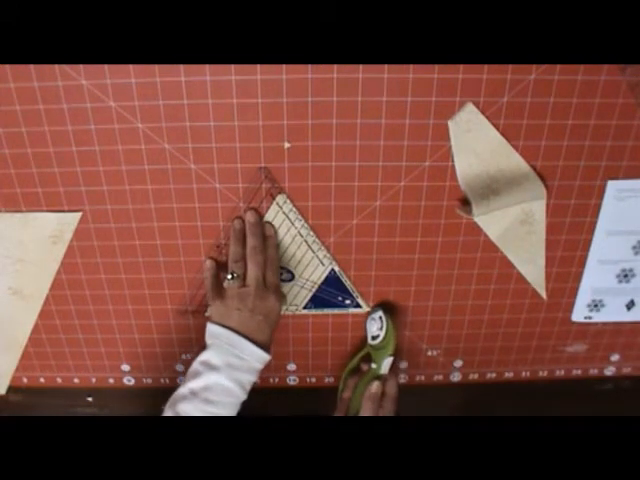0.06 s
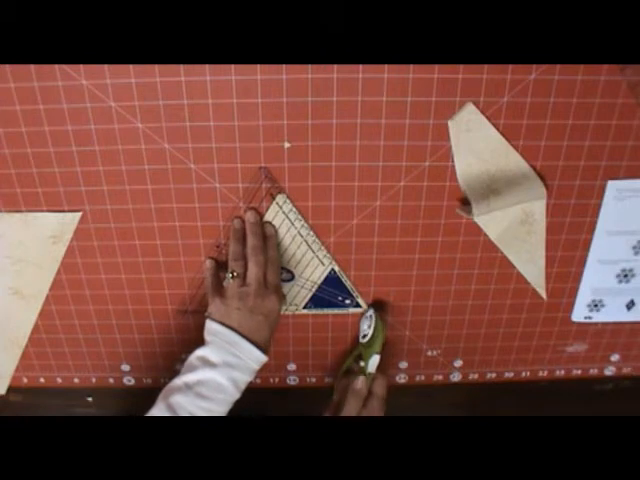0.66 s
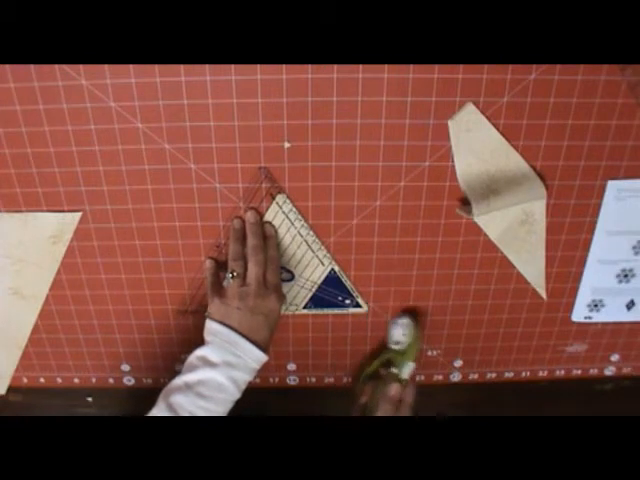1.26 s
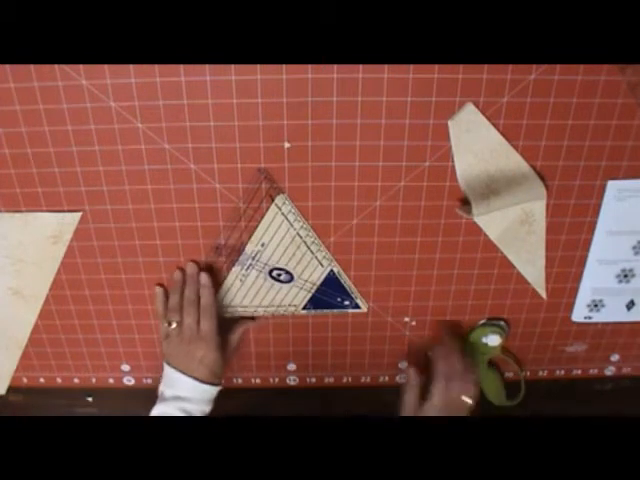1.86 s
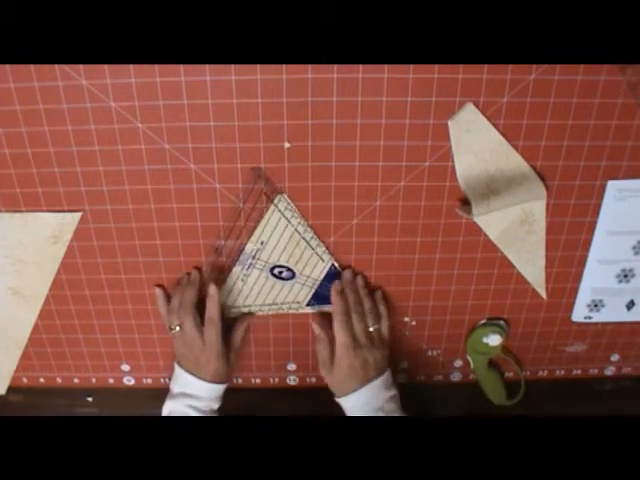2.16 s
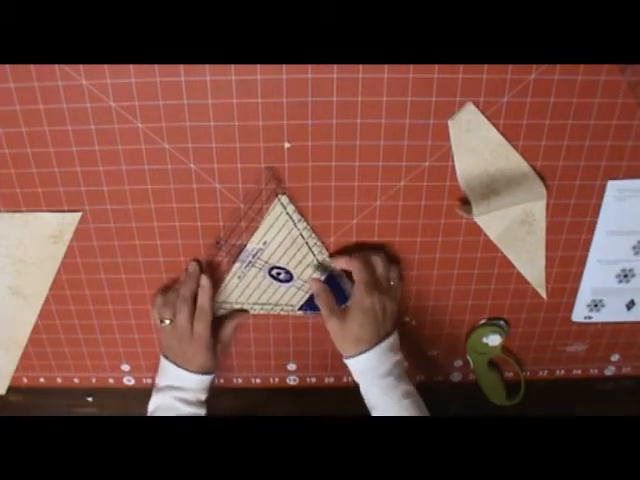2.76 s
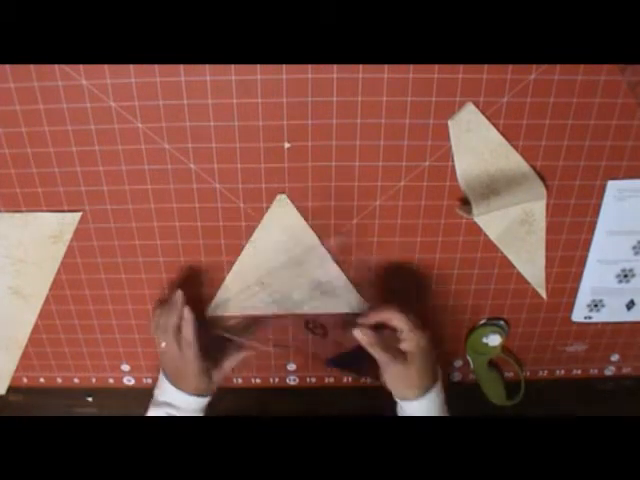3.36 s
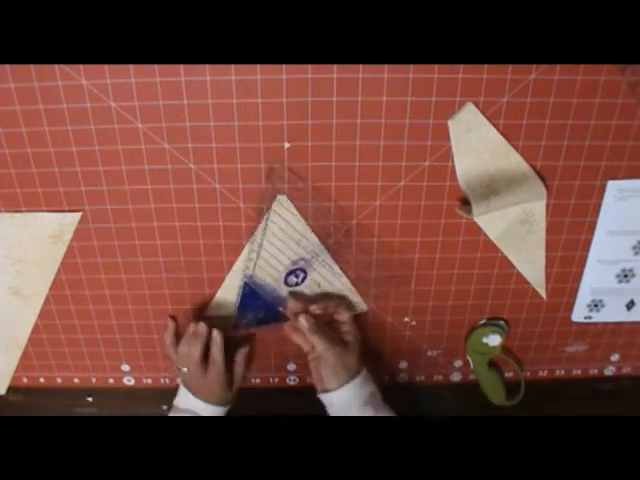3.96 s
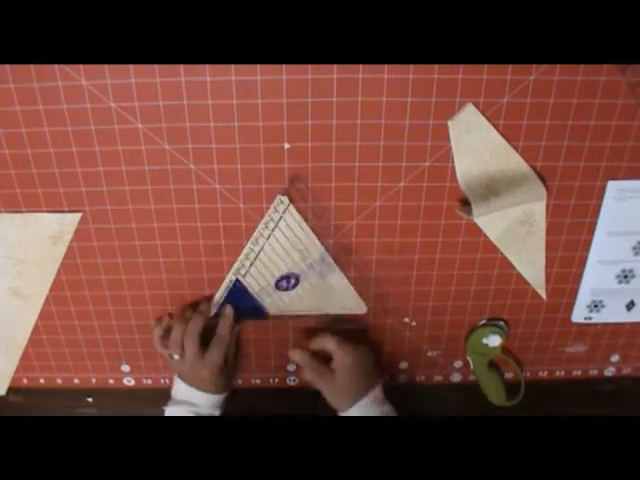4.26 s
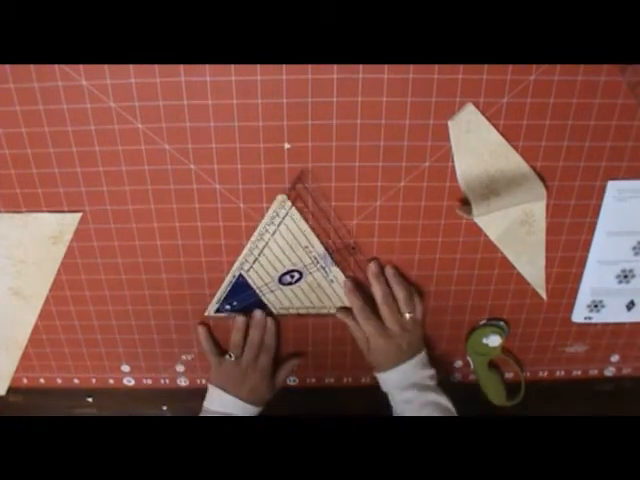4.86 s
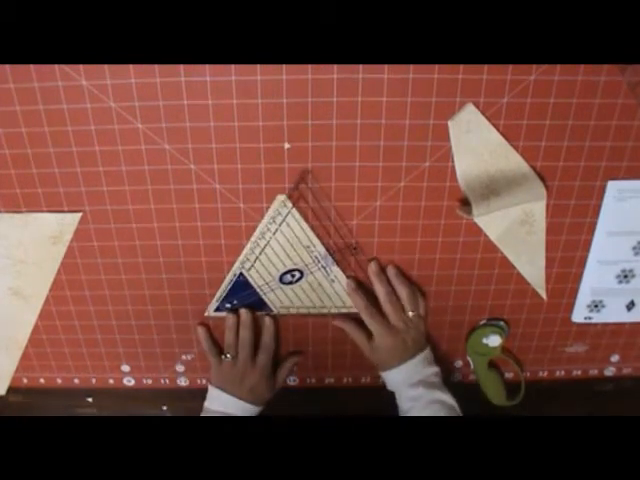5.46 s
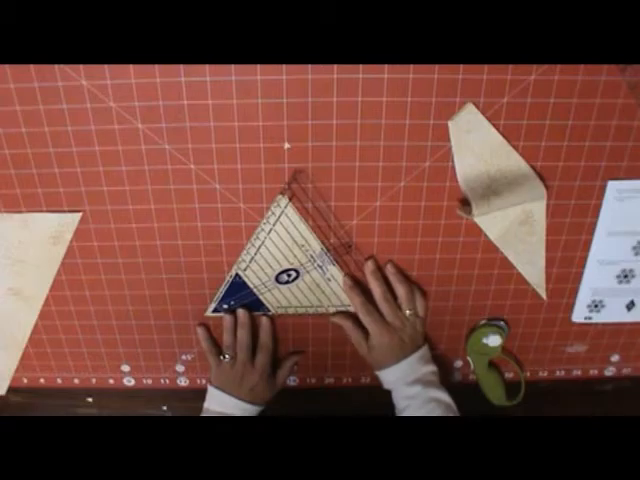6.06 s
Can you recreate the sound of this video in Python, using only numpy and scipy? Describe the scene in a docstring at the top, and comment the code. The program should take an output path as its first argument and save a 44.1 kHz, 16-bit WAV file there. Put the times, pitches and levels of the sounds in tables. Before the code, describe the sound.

A rotary cutter is set down with a plastic rattle, then an acrylic ruler clicks and drops onto a cutting mat.

```python
"""A soft hiss of blade on cloth: a rotary cutter ends its cut on a table with a cutting mat. An acrylic
ruler clicks, the cutter's guard sticks and slips shut, and the cutter is put down with a rattle.
The ruler is then picked at, turned over, dropped on the cloth and slid into place, fingers brushing
and squeaking on it. Each contact rings the plastic and thuds the table's low modes;
a small room answers, and a faint fan whines in it."""
import sys
import numpy as np
from scipy import signal
from scipy.fft import rfft, irfft, next_fast_len
from scipy.io import wavfile
from scipy.ndimage import uniform_filter1d

SR = 44100
rng = np.random.default_rng(int(sys.argv[2]) if len(sys.argv) > 2 else 0)


def dump_mix(stems):
    """Bounce the given channels to the path in sys.argv[1] as a 16-bit WAV at rate SR."""
    frames = np.atleast_2d(stems).T  # one column per channel
    limited = np.clip(frames, -1, 1)  # hard clip at full scale
    pcm = np.round(limited * 32767).astype(np.int16)
    wavfile.write(sys.argv[1], SR, pcm)


N = 269744
TOP_HZ = 11950
SIZE = 32768  # samples in one event's buffer
T = np.arange(SIZE) / SR
HZ = np.fft.rfftfreq(SIZE, 1 / SR) + 1

# the cutter's hits, levels relative: start_s, click_db, tilt_db_per_octave, chatter_t60_s, thud_db
CUTTER_HITS = [(.379, -49, .5, .018, -54), (1.566, -48, 5.5, .0074, -58), (1.68, -19.5, .5, .01, -14.5),
               (1.6824, -16.5, 0, 0.01, -24.5), (1.695, -26, 2, .04, -29), (1.7834, -24.5, 2.5, 0.045, -50),
               (1.7874, -18.5, 5.5, .017, -21.5), (1.7953, -26, 2, .025, -27), (1.816, -21.5, 1, .042, -26),
               (1.824, -21.5, -6, 0.05, -22), (1.855, -29.5, 3.5, .035, -47)]
# the broad tone of its plastic: frequency_hz, gain_db
CUTTER_TONE = [(100, -2), (500, -7.5), (1200, -7), (2400, -6.5), (3800, -4.5), (5300, -5.5), (7000, -13),
               (10500, -12), (12000, -21)]
# the ring of its shell and blade: pitch_hz, width_hz, peak_db (relative to the broad tone)
CUTTER_MODES = [(2290, 73, 4), (2550, 87, 9), (3500, 99, 4), (4540, 140, -12), (4870, 110, 0),
                (4950, 190, 0), (5880, 200, 3)]

def cutter():
    """The cutter knocks and rattles on the mat, ringing its shell and blade."""
    return clicks(CUTTER_HITS, body(CUTTER_TONE, CUTTER_MODES), favoured_hz=2500, climb_octaves=.38,
                  snap=0.48, level_db=18.5, walls_db=-2.5, early_db=-3, late_db=-5.5)


# the broad tone of the guard's rasp: frequency_hz, gain_db
GUARD_TONE = [(300, -24), (1200, -16.5), (1650, -4), (2500, 3.5), (3800, -4), (5000, 1), (7000, -8),
              (10000, -4.5), (12000, -13)]

def guard(start_s=1.2625, push_s=0.023, stop_s=0.013, settle_s=.013, level_db=-28):
    """The guard sticks and slips along the shell: pushed ever faster, it hits its stop and settles."""
    push_db = -13 * np.maximum(1 - T / push_s, 0) ** 2
    stop_db = -14 * np.clip((T - push_s) / stop_s, 0, 1)
    release = fade(np.maximum(T - push_s - stop_s - settle_s, 0), t60=.033)
    slips = grains(SIZE, spread_db=4) * amp(level_db + push_db + stop_db) * release
    shell = unit(causal(body(GUARD_TONE, CUTTER_MODES)))
    track = np.zeros(N)
    add(track, start_s, irfft(rfft(slips) * shell))
    return room(track, walls_db=-5.5, early_db=-9.5, late_db=-9.5)


# the ruler's hits, levels relative: start_s, click_db, tilt_db_per_octave, chatter_t60_s, thud_db
RULER_HITS = [(.752, -26, 1.6, 0.016, -41), (.762, -30, .3, 0.019, -42), (.815, -39, -.3, .055, -36),
              (2.302, -43, 1.5, .03, -44), (2.309, -44, 1.5, .1, -43), (2.466, -51, 6, .007, -60),
              (2.356, -51, -6, .035, -42.5), (2.496, -46, 1, 0.057, -46), (2.517, -37, 6, .0044, -43),
              (3.072, -45.5, -0.5, .051, -42), (3.722, -29, .5, 0.014, -41), (3.812, -35, 1.2, .012, -46.5),
              (4.3206, -28, 4.5, 0.0048, -35), (4.327, -37, .8, 0.024, -34), (4.597, -47.5, 0.5, .013, -38)]
# the broad tone of acrylic: frequency_hz, gain_db
RULER_TONE = [(100, -39), (400, -6), (850, 2), (1500, -5), (2400, -7), (4000, -10), (7000, -16),
              (10000, -15), (12000, -18.5)]
# the ring of the plate: pitch_hz, width_hz, peak_db (relative to the broad tone)
RULER_MODES = [(860, 50, -17), (1140, 190, -5.5), (1474, 160, 4.5), (2220, 510, 0.5)]

def ruler():
    """The acrylic plate clacks as it is picked at, turned over and dropped."""
    return clicks(RULER_HITS, body(RULER_TONE, RULER_MODES), favoured_hz=800, climb_octaves=.64,
                  snap=0.71, level_db=23.5, walls_db=-2.5, early_db=-4.0, late_db=-6.5)


def clicks(hits, body_db, favoured_hz, climb_octaves, snap, level_db, walls_db, early_db, late_db):
    """An object's hits; brighter ones favour higher modes, and the room answers each spot differently."""
    track = np.zeros((2, N))
    for start_s, db, tilt_db, chatter_t60, _ in hits:
        spot_hz = favoured_hz * 2 ** (climb_octaves * tilt_db)
        contact = click(body_db, tilt_db, chatter_t60, spot_hz, snap)
        add(track, start_s, amp(db + level_db) * room(contact, walls_db, early_db, late_db))
    return track


def click(body_db, tilt_db, chatter_t60, spot_hz, snap, boost_db=4, boost_octaves=0.27):
    """A first sharp touch and a dying chatter ring a plastic body; energy 1."""
    rattle = grains(SIZE, spread_db=8) * fade(T, chatter_t60)
    force = rattle / np.linalg.norm(rattle)
    force[0] += snap * fade(chatter_t60, 0.34)  # a long, scraping contact starts softly
    spectrum = rfft(force)
    # the force sets the timing; the colour belongs to the body and to the spot that is struck
    flatten_db = -10 * np.log10(np.abs(uniform_filter1d(np.abs(spectrum) ** 2, size=300)) + 1e-9)
    spot_db = boost_db * np.exp(-(np.log2(HZ / spot_hz) / boost_octaves) ** 2)
    octave = np.log2(np.maximum(HZ, 500) / 2000)
    ring = irfft(spectrum * causal(body_db + flatten_db + spot_db + tilt_db * octave))
    return ring / np.linalg.norm(ring)


def body(tone, modes):
    """An object's narrow resonances on top of its broad tone, in dB on the HZ grid."""
    peaks = sum(amp(db) ** 2 / (1 + (2 * (HZ - hz) / width) ** 2) for hz, width, db in modes)
    return along(tone, HZ) + 10 * np.log10(1 + peaks)


# a hand lands on the mat or presses the ruler flat, levels relative: start_s, thud_db
HAND_THUMPS = [(.82, -43.5), (1.245, -46), (2.077, -40.5), (2.408, -40.5), (2.517, -45), (2.914, -41.5),
               (3.223, -51), (4.319, -21), (5.9, -54.5)]

def table():
    """Hard plastic reaches the table's higher modes, a soft, heavy hand only the lowest."""
    return (thuds(RULER_HITS, lowest_hz=85, cutoff_hz=340, knock_db=19.5, lean=.02)
            + thuds(CUTTER_HITS, lowest_hz=92, cutoff_hz=500, knock_db=18.5, lean=0.15)
            + thuds(HAND_THUMPS, lowest_hz=62, cutoff_hz=130, knock_db=20, lean=.01))


def thuds(hits, lowest_hz, cutoff_hz, knock_db, lean, heavy_db=-30, width_db=-2):
    """The table under one kind of blow, as mid and side; heavier blows spread wider and lean right."""
    tracks = np.zeros((2, N))
    for start_s, *_, db in hits:
        heaviness = min(1, amp(db - heavy_db))
        add(tracks, start_s, amp(db) * np.outer([1, heaviness], thud(cutoff_hz, knock_db)))
    low_cut = signal.butter(3, lowest_hz, "highpass", fs=SR, output="sos")  # the board radiates no sub
    every, heavy = signal.sosfilt(low_cut, tracks)
    mid = room(every, walls_db=-16.0, early_db=-26.0, late_db=-12.5)[0]
    side = room(heavy, walls_db=-11, early_db=-14.0, late_db=-25)[1]
    return np.array([mid, amp(width_db) * side - lean * heavy])


# the ring of the table with its mat: pitch_hz, relative_db, t60_s
TABLE_MODES = [(90, -8.5, 0.14), (118.6, -1.5, 0.19), (158.5, -8.5, 0.11), (194.5, -2, 0.21),
               (233.8, -9, 0.56), (257, -5, 0.48), (299.3, 2, 0.08), (309.5, -8.5, 0.3), (351, -8, 0.2),
               (374, -9, 0.16), (452, -8, 0.2), (497.5, -7.5, 0.43), (530, -11, 0.28), (591, -13, 0.2),
               (690, -33, 0.19)]
# the tone of its dense, damped modes: frequency_hz, gain_db
KNOCK_TONE = [(50, -36), (110, -3), (170, -1.5), (300, -5), (600, -3.5), (1000, -11.5), (2000, -28),
              (4000, -64)]

def thud(cutoff_hz, knock_db, vary_db=3.5, detune=0.0089, knock_t60=0.17):
    """One blow rings the table's modes, a little differently for each spot and load."""
    hz, db, t60 = np.transpose(TABLE_MODES)[:, :, None]
    strength, load = rng.standard_normal((2, len(hz), 1))
    gain = amp(db + vary_db * strength) / np.hypot(1, (hz / cutoff_hz) ** 2)
    sign = (-1) ** (np.arange(len(hz))[:, None] // 2)
    t = T[:SIZE // 2]
    modes = np.sin(2 * np.pi * hz * (1 + detune * load) * t) * fade(t, t60)
    ring = np.sum(sign * gain * modes, axis=0) / np.linalg.norm(gain)
    # the mat damps the many other modes into one toneless knock
    colour_db = along(KNOCK_TONE, HZ) - 10 * np.log10(1 + (HZ / cutoff_hz) ** 2)
    burst = rng.standard_normal(SIZE) * fade(T, knock_t60)
    knock = irfft(rfft(burst) * causal(colour_db))[:len(t)]
    return 0.94 * ring + amp(knock_db) * knock / np.linalg.norm(knock)


# blade or ruler drags over the cloth: middle_s, length_s, relative_db, centre_hz
CLOTH_DRAGS = [(.01, .52, -52.5, 720), (.09, .46, -57.5, 190), (0.702, .16, -53, 1820),
               (.956, 0.039, -47, 1920), (1.114, .097, -55.5, 720), (1.183, 0.029, -46, 600),
               (1.54, .059, -51, 3400), (2.36, .12, -49, 600), (3.948, 0.077, -53.5, 1020),
               (4.106, .19, -50.5, 1370)]
# fingers brush over plastic: middle_s, length_s, relative_db
FINGER_BRUSHES = [(1.223, .12, -53), (2.247, 0.058, -43.5), (2.347, 0.19, -52), (2.879, 0.056, -45),
                  (3.227, .022, -47), (3.336, .062, -52), (3.627, .11, -52.5), (4.255, 0.057, -43)]
# a fingertip squeaks on the ruler: middle_s, relative_db, pitch_hz
FINGER_SQUEAKS = [(2.305, -39, 2730), (2.882, -48, 1280)]

def rubs(level_db=-6, squeak_s=.024):
    """Cloth drags dully, skin brushes brightly, and a sticking fingertip squeaks in a narrow band."""
    drags = sum(stroke(*drag, octaves=0.94, spread_db=4.5) for drag in CLOTH_DRAGS)
    brushes = sum(stroke(*brush, hz=3400, octaves=3.7, spread_db=5.5) for brush in FINGER_BRUSHES)
    squeaks = sum(stroke(middle_s, squeak_s, db, hz, octaves=0.16, spread_db=4.0)
                  for middle_s, db, hz in FINGER_SQUEAKS)
    return amp(level_db) * room(drags + brushes + squeaks, walls_db=-22.0, early_db=-3, late_db=-6.5)


def stroke(middle_s, length_s, db, hz, octaves, spread_db):
    """A band of friction grains swells and fades."""
    track, start_s = np.zeros(N), max(middle_s - length_s, 0)
    band = 1 / (1 + (np.log2(HZ / hz) / octaves) ** 2)
    hiss = unit(irfft(rfft(grains(SIZE, spread_db)) * band))
    swell = np.exp(-(2 * (T + start_s - middle_s) / length_s) ** 2)
    add(track, start_s, amp(db) * hiss * swell)
    return track


# slaps off near surfaces: delay_s, relative_db
WALL_ECHOES = [(.0068, -19), (0.0126, -17), (0.0161, -6)]

def room(dry, walls_db, early_db, late_db, scatter_t60=0.065):
    """Direct sound, near surfaces, scatter from the furniture and the room's tail, as mid and side."""
    envelope = fade(T, scatter_t60) * (1 - fade(T, 0.0091))
    scatter = rng.standard_normal((2, SIZE // 2)) * envelope[:SIZE // 2]
    response = amp(early_db) * scatter / np.linalg.norm(scatter[0]) + amp(late_db) * tail()
    response[0, 0] += 1  # direct sound
    for delay_s, db in WALL_ECHOES:
        response[0, round(delay_s * SR)] += amp(db + walls_db)
    return signal.fftconvolve(dry[None], response, axes=1)[:, :N]


# the small room's decay: frequency_hz, t60_s
ROOM_DECAY = [(100, 0.46), (300, 0.56), (1000, 0.48), (3000, 0.42), (6000, 0.38), (11000, 0.27)]

def tail(build_s=0.0079):
    """Mid and side reverb, each of energy 1, every frequency dying at its own speed."""
    hz, t, bands = signal.stft(rng.standard_normal((2, SIZE // 2)), SR, nperseg=256)
    reverb = signal.istft(bands * fade(t, along(ROOM_DECAY, hz)[:, None]), SR, nperseg=256)[1]
    reverb *= 1 - np.exp(-(T[:SIZE // 2] / build_s) ** 2)
    return reverb / np.linalg.norm(reverb, axis=1, keepdims=True)


# the fan's whine: pitch_hz, rms_db
FAN_TONES = [(118.4, -73), (699.8, -80), (839.8, -66.5), (1260, -80.5), (1680, -80.5)]

def fan(wander=0.000595):
    """Faint tones drift together with the fan's slightly unsteady speed."""
    t = np.arange(N) / SR
    drift = np.interp(t, np.arange(16) / 2, rng.standard_normal(16))
    rotor_time = t + wander * np.cumsum(drift) / SR
    return sum(np.sqrt(2) * amp(db) * np.sin(2 * np.pi * hz * rotor_time) for hz, db in FAN_TONES)


# the colour of the room tone: frequency_hz, relative_db
AIR_TONE = [(15, -51), (25, -11.5), (159, -2), (410, -13), (758, -13.5), (819, -16.5), (980, -16.5),
            (1230, -15.5), (1520, -22), (1680, -21.5), (11500, -26.5), (15000, -58), (22000, -120)]
# its stereo width: frequency_hz, side_gain_db
AIR_SPREAD = [(60, -33), (110, -32), (200, -19.5), (360, -9), (640, -1.5), (1170, -1), (2110, 2.5),
              (3830, -5), (6930, -11.5), (12600, -40)]

def room_tone(level_db=-58.5):
    """A steady bed of centred rumble and wider hiss, as mid and side."""
    air = filtered(rng.standard_normal((2, N)), lambda hz: amp(along(AIR_TONE, hz)) * (hz < TOP_HZ))
    mid, side = amp(level_db) * unit(air)
    return np.array([mid, filtered(side, lambda hz: amp(along(AIR_SPREAD, hz)))])


def grains(size, spread_db):
    """Tiny slips of very unequal strength, rms 1."""
    return unit(rng.standard_normal(size) * amp(spread_db * rng.standard_normal(size)))


def causal(db):
    """The minimum-phase response with these levels on the HZ grid."""
    cepstrum = irfft(np.log(amp(db)))
    cepstrum[1:SIZE // 2] *= 2
    cepstrum[SIZE // 2 + 1:] = 0
    return np.exp(rfft(cepstrum))


def filtered(x, gain):
    """Equalise x with a gain that depends on frequency."""
    size = next_fast_len(N + SR // 2)
    return irfft(rfft(x, size) * gain(np.fft.rfftfreq(size, 1 / SR)), size)[..., :N]


def amp(db):
    """Decibels to gain."""
    return 10 ** (np.asarray(db) / 20)


def unit(x):
    """Scale to rms 1."""
    return x / np.sqrt(np.mean(x ** 2) + 1e-20)


def along(points, hz):
    """Read a curve of (frequency_hz, value) points on a log axis."""
    frequencies, values = np.transpose(points)
    return np.interp(np.log(hz + 1), np.log(frequencies), values)


def fade(t, t60):
    """Exponential decay by 60 dB in t60 seconds."""
    return np.exp(-np.log(1000) * t / np.maximum(t60, 1e-4))


def add(track, start_s, x):
    """Mix x into the track from start_s."""
    start = max(round(start_s * SR), 0)
    part = x[..., :max(N - start, 0)]
    track[..., start:start + part.shape[-1]] += part


# the width of the room's answer to clicks, rasp and rubs: frequency_hz, side_gain_db
ROOM_SPREAD = [(100, -31), (500, -15), (1000, -10), (2500, -50), (10000, -45)]

def scene(cutter_lean=0.016):
    """The tabletop in a narrow stereo image, the cutter a little to the right; left and right out."""
    clacks, rattle = ruler(), cutter()
    mid, side = clacks + rattle + guard() + rubs()
    side = filtered(side, lambda hz: amp(along(ROOM_SPREAD, hz))) - cutter_lean * rattle[0]
    mid, side = np.array([mid, side]) + table() + room_tone()
    mid += fan()
    return np.array([mid + side, mid - side])


def record(dry):
    """A steep high cut at TOP_HZ takes off the top of the treble."""
    return filtered(dry, lambda hz: np.clip((TOP_HZ - hz) / 300 + .5, 0, 1))


dry = scene()
out = record(dry)
dump_mix(out)
```